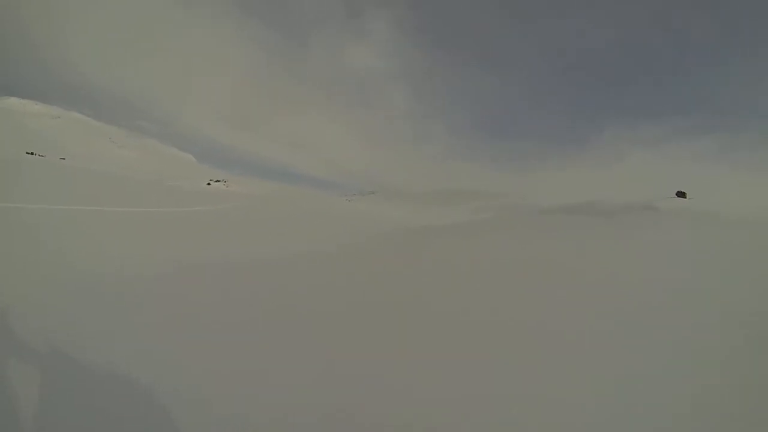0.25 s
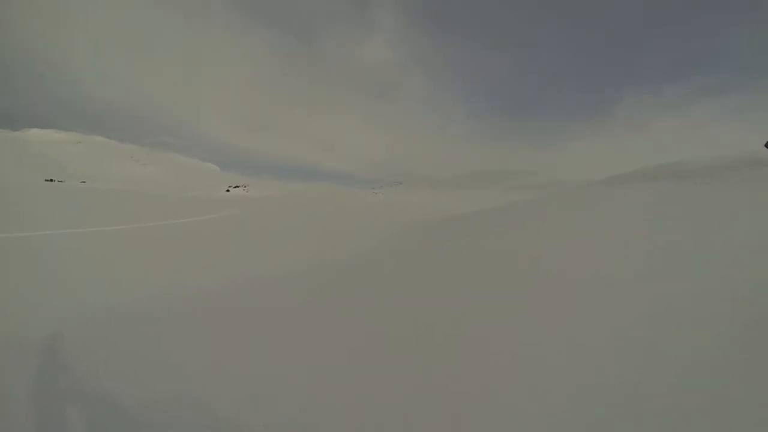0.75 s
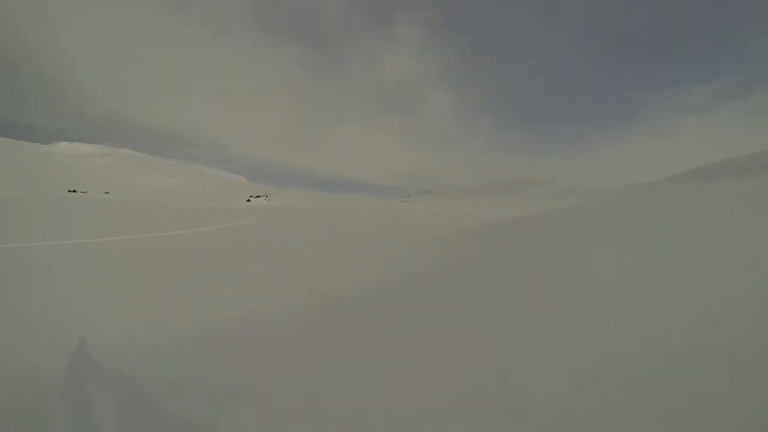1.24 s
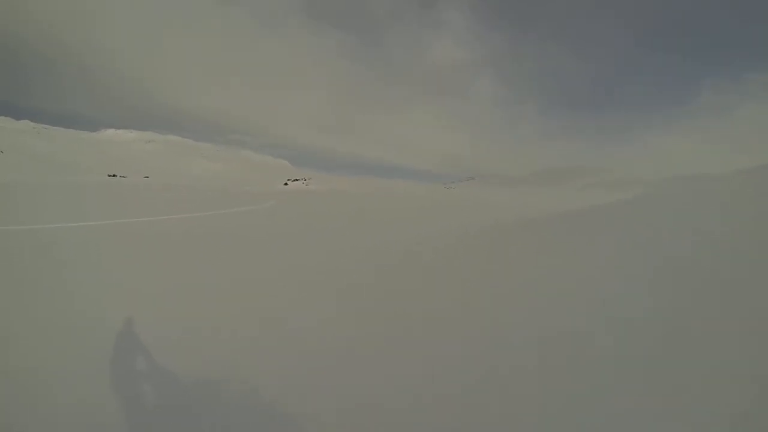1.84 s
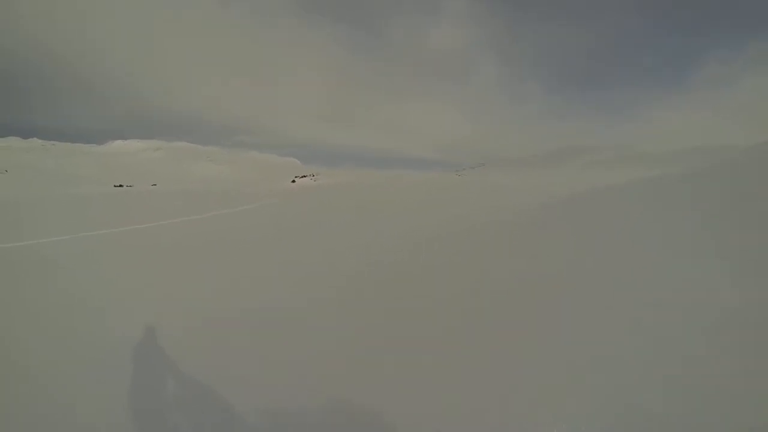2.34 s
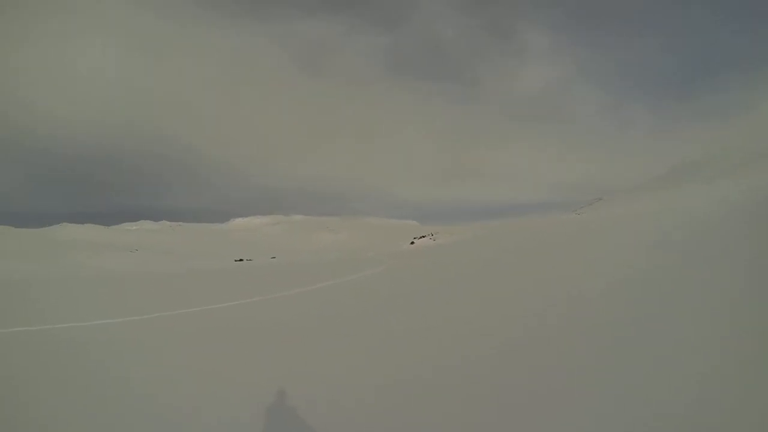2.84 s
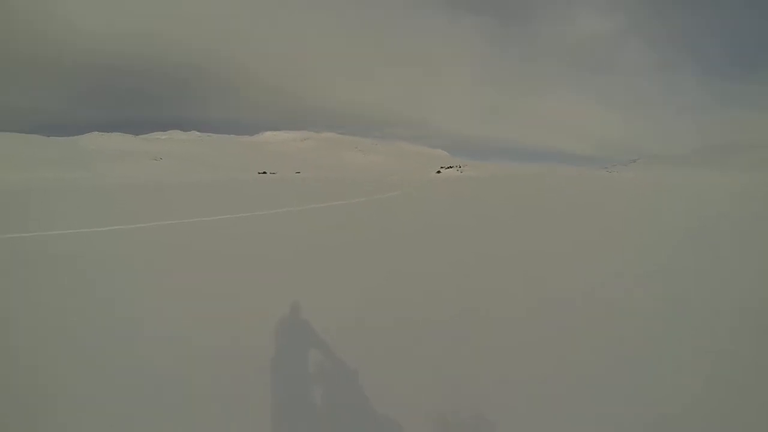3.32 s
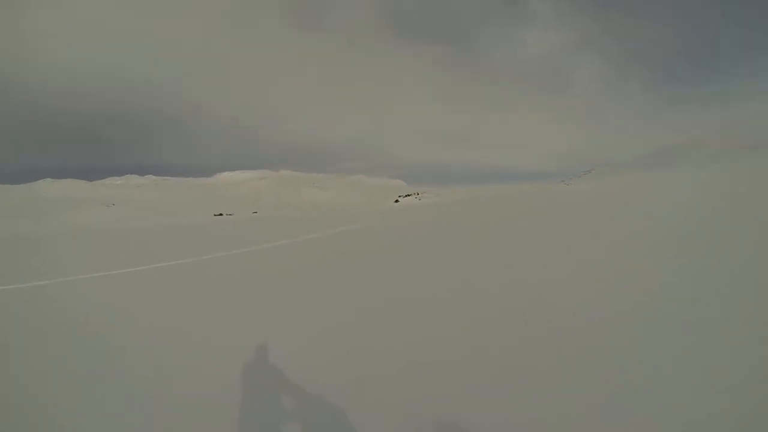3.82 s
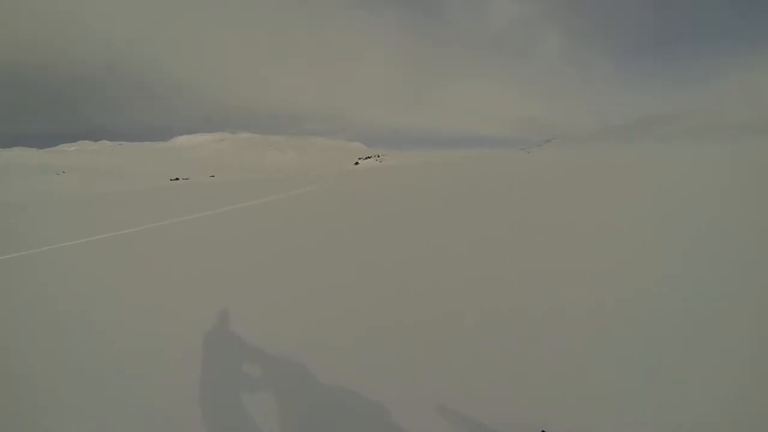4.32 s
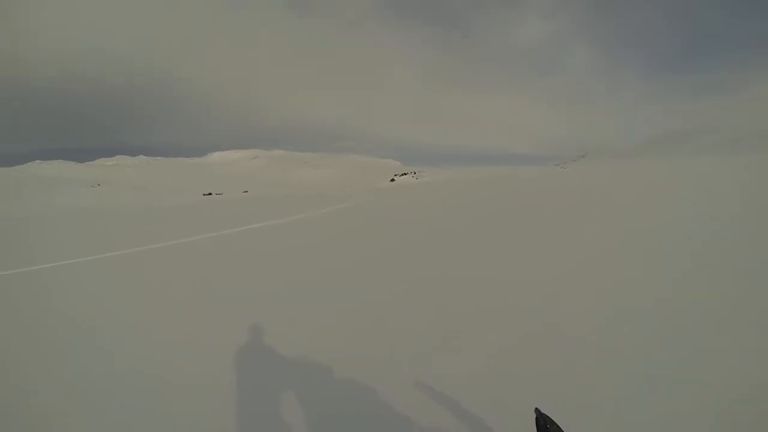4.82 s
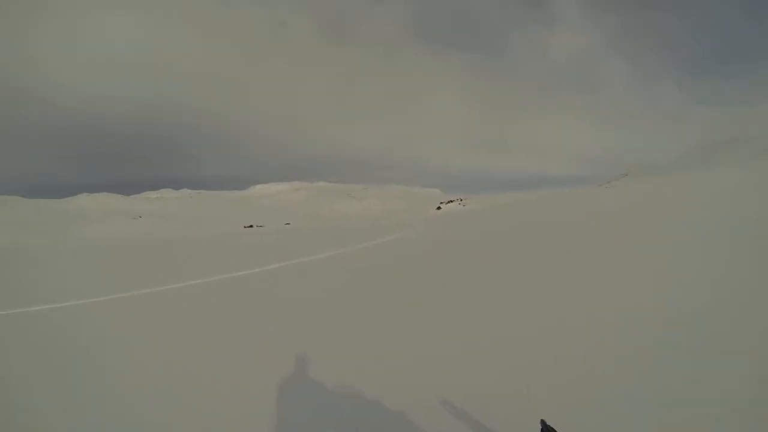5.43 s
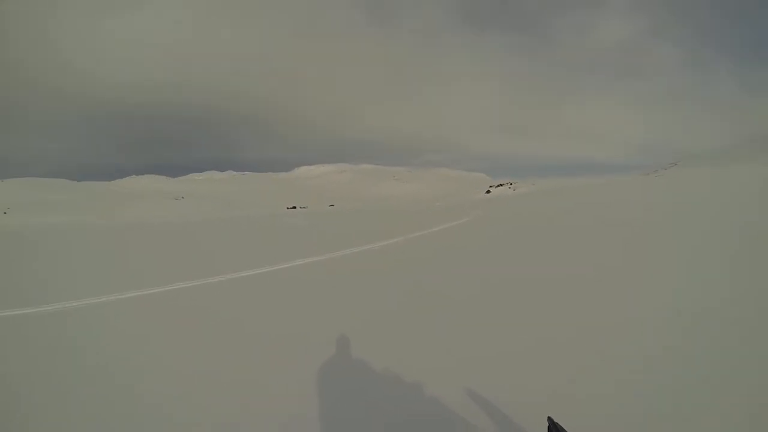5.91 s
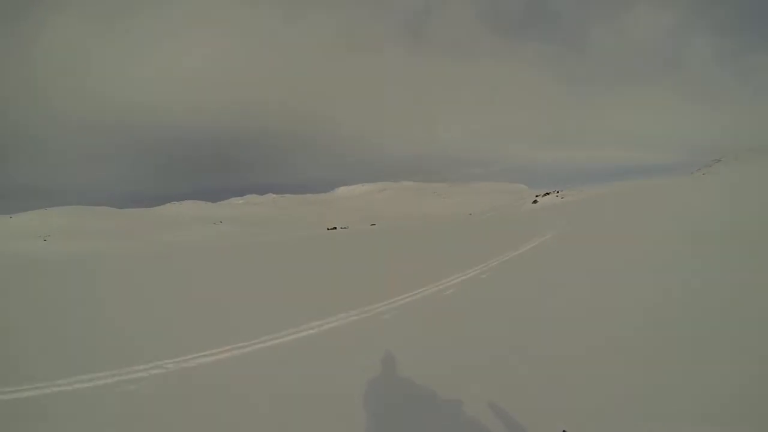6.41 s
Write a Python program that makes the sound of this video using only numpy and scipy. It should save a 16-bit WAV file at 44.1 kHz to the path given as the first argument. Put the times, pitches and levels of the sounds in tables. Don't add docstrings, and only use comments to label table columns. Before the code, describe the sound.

Heard from a sealed camera on the rider's helmet, a turbocharged snowmobile shuts its throttle: a bright hissing, squealing blow-off and falling whistle, while the engine note drops quickly. It putters unevenly, then coasts quietly with a sliding chain whine and scattered knocks. After four seconds it surges back with boxy, nasal roar, rattling raps and gear whine. Low wind thuds on an open snowfield.

```python
import sys
import numpy as np
from scipy import signal
from scipy.fft import rfft
from scipy.io import wavfile
from scipy.ndimage import uniform_filter1d

SR = 44100
rng = np.random.default_rng(int(sys.argv[2]) if len(sys.argv) > 2 else 0)


def magnitude_from_level(level_db):
    exponent = np.asarray(level_db, float) / 20
    return 10 ** exponent


def output_pcm(signal):
    pcm = np.clip(np.atleast_2d(signal).T, -1, 1) * 32767
    wavfile.write(sys.argv[1], SR, np.round(pcm).astype(np.int16))


N = 293706
T = np.arange(N) / SR
STEP = 32
T_SLOW = np.arange(0, N, STEP) / SR


def evened(x):
    return x / np.sqrt(np.mean(x ** 2) + 1e-20)


def read(points, hz):
    f, value = np.transpose(points)
    return np.interp(np.log(hz + 1), np.log(f + 1), value, -120, -120)


def columns(rows, t):
    s, *values = np.transpose(rows)
    return [np.interp(t, s, v) for v in values]


def bumps(rows, t, size=lambda v: v, least_s=.02):
    grid = np.arange(0, N / SR + .01, least_s / 5)
    total = np.zeros(len(grid))
    for s, height, half in rows:
        away = np.clip((grid - s) / max(half, least_s), -1, 1)
        total += size(height) * np.cos(np.pi / 2 * away) ** 2
    return np.interp(t, grid, total)


def wander(count, step=1):
    knots = rng.standard_normal(int(N / SR * 100) + 9)
    knots = uniform_filter1d(knots, max(int(100 / count), 2))
    knots = evened(knots - knots.mean())
    return np.interp(np.arange(0, N, step) / SR * 100, np.arange(len(knots)), knots)


def sine(turns):
    return np.sqrt(2) * np.sin(2 * np.pi * turns)


def noise(points, size, band_hz, patchy_db, light=None, curve=None):
    low, high = band_hz
    frames, hz = 4 * N // size + 6, np.fft.rfftfreq(size, 1 / SR)
    a, b, patches = rng.standard_normal((frames, len(hz), 3)).T
    patches = uniform_filter1d(patches, size=6, axis=0)
    patches = evened(uniform_filter1d(patches, size=7, axis=1))
    shape_db = read(points, hz)[:, None] * np.ones(frames)
    if light:
        share = np.clip(columns(curve, np.arange(frames) * size / 4 / SR)[-1], 0, 1)
        shape_db = share * shape_db + (1 - share) * read(light, hz)[:, None]
    inside = (hz >= low) & (hz < high)
    shape = magnitude_from_level(shape_db) / np.linalg.norm(magnitude_from_level(shape_db[inside]), axis=0)
    spectra = (a + 1j * b) * shape * magnitude_from_level(patchy_db * patches)
    x = signal.istft(spectra, nperseg=size, noverlap=size * 3 // 4)[1][:N]
    power, all_hz = abs(rfft(x)) ** 2, np.fft.rfftfreq(N, 1 / SR)
    in_band = power[(all_hz >= low) & (all_hz < high)].sum()
    return evened(x) * np.sqrt(power.sum() / in_band)


def narrow(hz, width_hz):
    b, a = signal.butter(2, width_hz / 2, fs=SR)
    slow = rng.standard_normal(len(hz)) + 1j * rng.standard_normal(len(hz))
    slow = signal.lfilter(b, a, slow)
    return evened((slow * np.exp(2j * np.pi * np.cumsum(hz) / SR)).real)


# t/s, f/Hz
SPEED = [(0, 210), (.06, 199), (.27, 125), (.39, 105), (.6, 119.5), (1.06, 126), (1.18, 124), (1.37, 106.5),
         (1.62, 100.2), (3.26, 92.6), (3.55, 98.3), (4.03, 103.5), (4.56, 125.5), (5.42, 152.5), (5.9, 155),
         (6.14, 156.5), (6.43, 175), (6.66, 178)]
# centre t/s, shift f/Hz, half length t/s
SURGES = [
    (2.55, -1.5, .25),
    (2.87, 1, .15),
    (4.32, 22, .27),
    (4.73, 6.5, .16),
    (5.17, 18, .25),
]


def crank():
    hz = uniform_filter1d(columns(SPEED, T)[0] + bumps(SURGES, T), size=2000)
    return hz, np.cumsum(hz * (1 + .002 * wander(20))) / SR


def order(turns, k, db):
    return magnitude_from_level(db).repeat(STEP)[:N] * sine(k * turns + rng.random())


# t/s, load [0-1]
LOAD = [(0, .8), (.3, .3), (.6, .3), (1.15, .4), (1.3, .02), (3.5, .05), (4, .3), (4.3, .6), (4.5, .6),
        (5, .8), (5.4, .9), (6.66, .99)]
# coasting level/dB, loaded level/dB
FIRING = [
    (-35.5, -33.5),
    (-40, -34),
    (-41.5, -44.5),
    (-56, -42),
    (-58, -37.5),
]
# centre t/s, level/dB, half length t/s
BOOMS = [
    [(.02, 8, 0.082), (.2, 6, 0.083), (.31, 11.5, 0.14), (.7, -6, 0.1), (1.27, 6, 0.31), (2.62, 8, 0.39),
     (3.05, -3.5, 0.17), (3.6, -3.5, 0.17), (4.07, 10.5, 0.32), (4.5, 5, 0.19), (5.1, 5, 0.21),
     (6.1, 4.5, 0.31), (6.57, -3, 0.21)],
    [(.23, -3, 0.29), (3.4, 2, 0.89), (1.05, 5, 0.31), (1.42, -35, 0.29), (1.8, -7.5, 0.57),
     (4.22, 7.5, 0.5)],
    [(0, 4, .1), (.2, -16, 0.23), (.75, -10, 0.26), (1.42, -25, 0.35), (4.0, 4.5, 0.33), (5.35, -5, 0.34),
     (6.6, 4.5, 0.77)],
    [(0, 9.5, 0.14), (.19, 7, 0.083), (.4, 1, 0.13), (1.5, -7, 0.4), (4.68, -3.5, 0.16), (3.88, 6, 0.17),
     (4.36, -19.5, 0.32), (4.9, -6, 0.15)],
    [(1.4, 15.5, 0.49), (4.4, 12, 0.45), (6.1, 3, 0.15)],
]
# centre t/s, flutter level/dB, half length t/s
STUMBLE = [
    (.12, 1.5, .35),
]


def under_load(coasting_db, loaded_db):
    return coasting_db + columns(LOAD, T_SLOW)[0] * (loaded_db - coasting_db)


def firing(turns):
    out = np.zeros(N)
    for k, (coasting, loaded), rows in zip([1, 2, 3, 4, 4 / 3], FIRING, BOOMS):
        db = under_load(coasting, loaded) + bumps(rows, T_SLOW) + 1.8 * wander(9, STEP)
        flutter_db = bumps(STUMBLE, T_SLOW) * wander(30, STEP)
        out += order(turns, k, db + flutter_db)
    return out


# thirds of the firing rate, coasting level/dB, loaded level/dB
UNEVEN = [(2, -42, -46), (5, -50, -46), (7, -50, -46), (8, -50, -53), (10, -51, -51), (11, -62, -54),
          (13, -60, -61), (14, -64, -59), (15, -63, -53), (16, -68, -61), (17, -68, -58), (18, -63, -59),
          (19, -70, -56), (20, -70, -61), (21, -68, -62)]
# centre t/s, level/dB, half length t/s
RASP = [
    (0, 10.5, 0.15),
]


def uneven_cylinders(turns):
    out = np.zeros(N)
    for third, coasting, loaded in UNEVEN:
        db = under_load(coasting, loaded) - 3.5 + bumps(RASP, T_SLOW) + 3.5 * wander(4, STEP)
        out += order(turns, third / 3, db)
    return out


# (centre t/s, peak
# level/dB, half length t/s)
GEARS = [
    (10, [(5.87, -23.5, .16), (6.06, -19.5, .15), (5.2, -25, .2)]),
    (29 / 3, [(6.355, -19, .06)]),
    (13, [(6.48, -40, .08), (6.6, -38, .2)]),
    (9, [(5.5, -32, .15), (5.8, -31, .2)]),
    (8, [(6.55, -28, .25)]),
    (26 / 3, [(6.56, -25, .15)]),
    (32 / 3, [(5.5, -25, .05), (5.88, -26.5, .22)]),
    (5, [(4.75, -51, .4), (6.0, -57, .4)]),
    (19 / 3, [(5.9, -57, .2)]),
]


def gears(turns):
    out = np.zeros(N)
    for k, rows in GEARS:
        db = 20 * np.log10(bumps(rows, T_SLOW, magnitude_from_level) + 1e-5)
        out += order(turns, k, db + 1.5 * wander(12, STEP))
    return out


# f/Hz, level/dB
ROAR = [(620, -61), (1050, -40), (1160, -28), (1380, -11), (1470, -11), (1550, 1.5), (1720, -4.5),
        (1780, -23.5), (1950, -31), (2060, -20.5), (2270, -23), (2630, -38.5), (2930, -29), (3320, -25.5),
        (4100, -39.5), (5330, -67), (9020, -120)]
# f/Hz, level/dB
ROAR_AWAY = [(560, -67), (950, -76.5), (1010, -13), (1130, -20.5), (1370, 1.5), (1600, 4), (1770, -6),
             (1940, -17), (2280, -12), (2470, -17.5), (2770, -15.5), (3330, -19.5), (4100, -29),
             (5330, -63), (9020, -120)]
# t/s, roar level/dB
EFFORT = [(0, -15), (.25, -15), (.32, -18), (.52, -18), (.62, -25.5), (.75, -27.5), (.9, -22), (1.2, -22),
          (1.52, -24), (1.7, -26.5), (2.0, -29), (2.4, -31), (3.3, -31.5), (3.97, -30), (4.25, -24.5),
          (4.7, -23.5), (5.1, -20.5), (6.1, -19.5), (6.66, -17)]
# t/s, share of the exhaust-side colour [0-1]
HELMET = [
    (0, 0.03),
    (1.1, 0.06),
    (2.2, 0.27),
    (3.9, 0.52),
    (4.7, 0.62),
    (5.5, 0.48),
    (6.05, 0.49),
    (6.66, 0.48),
]
# centre t/s, level/dB, half length t/s
BARKS = [
    (4.35, 5, 0.13),
    (4.69, 3.5, 0.19),
    (4.99, 4, 0.075),
    (5.27, 1.5, 0.18),
    (5.49, 1, 0.035),
    (6.29, -2.5, 0.12),
    (6.355, 0, 0.017),
    (6.43, -4.5, 0.041),
]


def knock(hz, turns, roar_db):
    knock_db = roar_db[::STEP] - 14 + 20 * np.log10(columns(LOAD, T_SLOW)[0])
    out = np.zeros(N)
    for third in range(22, 43):
        case_db = read(ROAR, third / 3 * hz[::STEP])
        out += order(turns, third / 3, knock_db + case_db + 4 * wander(5, STEP))
    return out


def roar(roar_db, puff, hush):
    x = noise(ROAR, 1024, (1150, 2000), patchy_db=0.13, light=ROAR_AWAY, curve=HELMET)
    x = magnitude_from_level(roar_db - 3.0) * puff * x
    band = signal.butter(2, (1150, 1950), 'bandpass', fs=SR, output='sos')
    return x - (1 - hush) * signal.sosfiltfilt(band, x)


def ring(effort_db):
    helmet_db = 10 * np.log10(np.clip(columns(HELMET, T)[0], .05, 1))
    level_db = effort_db + 1.4 * bumps(BARKS, T) + helmet_db - 5
    return magnitude_from_level(level_db) * narrow(1655 + 30 * wander(6), width_hz=24)


# t/s, peak level/dB
RAPS = [(0.7, -24), (0.7655, -19), (1.0537, -21), (1.3233, -15.5), (1.3587, -13), (1.7293, -21),
        (2.0248, -20), (2.2447, -20), (3.2131, -21), (3.261, -32), (3.3406, -19.5), (3.7996, -19),
        (4.1188, -19), (4.1725, -21), (4.3259, -9.5), (4.348, -12.5), (4.3685, -8.5), (4.3928, -14),
        (4.4852, -21), (4.554, -14), (4.6308, -13), (4.852, -13), (4.8746, -10.5), (5.472, -12),
        (5.6772, -16), (5.7942, -13), (5.91, -10.5), (6.168, -11), (6.2776, -10), (6.5235, -9),
        (6.6079, -12)]


def raps():
    rise_s, fall_s = .0036, .0038
    t, out = np.arange(0, .04, 1 / SR), np.zeros(N + SR)
    shape = np.sin(np.pi / 2 * np.minimum(t / rise_s, 1)) ** 2
    shape *= np.exp(-(np.maximum(t - rise_s, 0) / fall_s) ** 2)
    for s, db in RAPS:
        detune, phase = rng.standard_normal(2)
        at = round((s - rise_s / 2) * SR)
        out[at:at + len(t)] += magnitude_from_level(db - 1) * shape * np.sin(2 * np.pi * ((1620 + 50 * detune) * t + phase))
    hush_db = bumps([(s, -14, .008) for s, db in RAPS], T, least_s=.002)
    return out[:N], magnitude_from_level(hush_db)


# t/s, jet level/dB
VALVE = [
    (0, -40.5),
    (.1, -36),
    (.13, -35),
    (.17, -34.5),
    (.23, -38.5),
    (.28, -40),
    (.36, -53),
    (.56, -71),
    (.6, -65),
]
# f/Hz, level/dB per Hz
JET = [(1180, -58), (2000, -10), (2210, -17), (2440, -18), (2840, -1.5), (3090, -1), (3770, 1), (4310, -12),
       (5680, -1.5), (6330, 1.5), (7060, -12.5), (8200, -3.5), (9220, -13), (12900, -12), (15200, -31)]
# f/Hz, width f/Hz, centre t/s, peak level/dB, half length t/s
SQUEALS = [
    (2900, 70, .13, -38, .24),
    (3700, 70, .165, -31, .07),
    (3890, 90, .152, -37, .03),
    (3550, 500, .18, -32, .1),
    (3250, 70, .24, -34, .05),
    (3480, 90, .275, -39, .03),
    (3300, 150, .14, -38, .04),
    (2820, 90, .31, -39, .04),
]


def valve():
    t = np.arange(round(VALVE[-1][0] * SR)) / SR
    jet = noise(JET, 512, (4000, 10000), patchy_db=-2.5)[:len(t)]
    out = magnitude_from_level(columns(VALVE, t)[0]) * jet
    for hz, width_hz, *swell in SQUEALS:
        out += bumps([swell], t, magnitude_from_level) * narrow(np.full(len(t), float(hz)), width_hz)
    return np.pad(out, (0, N - len(t)))


# t/s, f/Hz, level/dB
TURBINE = [
    (0, 12970, -50),
    (.04, 12910, -52),
    (.074, 12650, -50),
    (.1, 12050, -54),
    (.136, 11210, -52),
    (.19, 11000, -66),
]


def turbine():
    hz, level_db = columns(TURBINE, T)
    turns = np.cumsum(hz * (1 + .004 * wander(27))) / SR
    start_s, end_s = TURBINE[0][0], TURBINE[-1][0]
    fade = np.clip(np.minimum(T - start_s + 0.012, end_s - T + 0.0022) / 0.015, 0, 1)
    return fade * magnitude_from_level(level_db) * sine(turns)


# t/s, f/Hz
TRACK = [(.4, 2090), (.95, 2150), (1.15, 2120), (1.35, 1890), (1.55, 1735), (1.75, 1662), (2.25, 1535),
         (2.45, 1440), (2.65, 1388), (2.9, 1350), (3.05, 1285), (3.24, 1243), (3.9, 1205), (4.9, 1887),
         (5.2, 1990), (6.08, 2040), (6.3, 2190), (6.66, 2305)]
# centre t/s, peak level/dB, half length t/s
LUG = [
    (.45, -33.5, 0.12),
    (1.33, -41.5, 0.26),
    (2.6, -37, 0.25),
    (3.8, -47, .2),
    (5.2, -37, 0.63),
    (5.9, -47.5, 0.31),
    (6.3, -49, 0.18),
]
# centre t/s, peak level/dB, half length t/s
LUG_OCTAVE = [
    (1.05, -48, 0.24),
    (2.35, -55, 1),
    (5.5, -57, 0.15),
    (5.95, -46, 0.46),
]
# centre t/s, peak level/dB, half length t/s
WHINE = [
    (1.55, -37, .2),
    (2.17, -32, .45),
    (3.05, -42, .75),
]
# centre t/s, peak level/dB, half length t/s
WHINE_HIGH = [
    (2.17, -50, .2),
    (2.78, -54, .35),
]
# centre t/s, peak level/dB, half length t/s
WHINE_OCTAVE = [
    (1.93, -54, .15),
    (2.25, -55, .15),
    (2.63, -57, .15),
    (2.92, -57, .18),
]


def track():
    hz = uniform_filter1d(columns(TRACK, T)[0], size=2000)
    links = np.cumsum(hz * (1 + .002 * wander(25))) / SR
    lugs = np.cumsum(hz * (1 + .004 * wander(25))) / SR / 10.2
    parts = [(LUG, lugs), (LUG_OCTAVE, 2 * lugs), (WHINE, links),
             (WHINE_HIGH, 3 / 2 * links), (WHINE_OCTAVE, 2 * links)]
    return sum(bumps(rows, T, magnitude_from_level) * sine(turns) for rows, turns in parts)


def follow(effort_db, idle_db, slope, lagged):
    boost_lag_s = 0.35
    r = np.exp(-1 / (boost_lag_s * SR))
    above = effort_db + 31
    boost = signal.lfilter([1 - r], [1, -r], above, zi=[r * above[0]])[0]
    return idle_db + slope * (lagged * boost + (1 - lagged) * above)


# f/Hz, level/dB
HISS = [(2240, -23), (3800, -3.5), (4040, -13.5), (4380, -2), (4880, -3), (5620, -11.5), (5910, -8),
        (6540, -6), (7080, -18), (8210, -8.5), (9300, -24), (10100, -20.5), (11900, -28.5), (13100, -24),
        (15200, -42)]
# f/Hz, level/dB
HISS_LIGHT = [(2240, -25), (3800, -0.5), (4070, 1), (5020, 6.5), (5680, -2), (6810, -8.5), (8260, -6),
              (8790, -13), (10600, -22.5), (13100, -33.5), (14700, -33.5)]


def intake(effort_db, flicker_db, puff):
    level_db = follow(effort_db, idle_db=-62.5, slope=1.43, lagged=0.22)
    level_db = level_db + 0.1 * bumps(SURGES, T)
    hiss = noise(HISS, 512, (4000, 10000), patchy_db=1.05, light=HISS_LIGHT, curve=LOAD)
    return magnitude_from_level(level_db + flicker_db) * puff * hiss


# f/Hz, level/dB
RUMBLE = [(40, 7.5), (70, 28), (110, 20.5), (200, 7), (330, 4.5), (420, 4), (600, 3), (800, -8.5),
          (1000, -17), (1200, -19)]
# f/Hz, level/dB
RUMBLE_LIGHT = [(40, 16), (110, 10.5), (330, 2), (500, -5.5), (750, -8), (1000, -6), (1200, -9.5)]


def rumble(effort_db):
    level_db = follow(effort_db, idle_db=-53.5, slope=0.77, lagged=0.28) + bumps(STUMBLE, T)
    return magnitude_from_level(level_db) * noise(RUMBLE, 2048, (420, 1000), patchy_db=1.5, light=RUMBLE_LIGHT, curve=HELMET)


# t/s, f/Hz, level/dB
NOD = [(0, 14, -25), (.42, 13, -23), (.62, 13.5, -16), (.85, 13.2, -19), (1.2, 14, -23), (1.48, 13.7, -30),
       (1.85, 13.5, -18), (2.1, 14.5, -21), (2.35, 12, -18), (2.7, 12.2, -27), (3.25, 14.5, -22),
       (3.55, 12, -30), (3.9, 12.7, -23), (4.7, 15, -28), (5.1, 14.6, -18), (5.9, 14.8, -23),
       (6.1, 15, -33), (6.66, 15.3, -25)]


def nod():
    hz, level_db = columns(NOD, T)
    turns = np.cumsum(hz * (1 + .1 * wander(7))) / SR
    swing = sine(turns) + .25 * sine(2 * turns + 1 / (2 * np.pi))
    return magnitude_from_level(level_db - 1.5 + 1.2 * wander(6)) * swing


# f/Hz, level/dB
WIND = [(16, -13), (24, 2), (35, 6), (50, 2.5), (65, -5), (80, -12), (100, -22.5), (140, -28.5)]
# centre t/s, level/dB, half length t/s
THUDS = [(.33, 7, .1), (.62, 9.5, 0.13), (1.68, 15, 0.059), (3.2, 8, .2), (3.7, -9, .15), (4.4, 7.5, 0.17),
         (4.85, 5, .06), (4.97, -8, .05), (5.88, 10, .08), (6.12, 0.5, 0.15), (6.55, 3.5, .1)]


def wind():
    level_db = -31.5 + 6 * columns(LOAD, T)[0] + bumps(THUDS, T)
    return magnitude_from_level(level_db) * noise(WIND, 4096, (24, 85), patchy_db=0.4)


# f/Hz, level/dB per Hz
SNOW = [(2240, -29.5), (3800, -2), (4400, 10.5), (4690, -10.5), (5190, 0), (7410, -7), (8210, -26),
        (8990, -15), (10200, -12.5), (13100, -19.5), (14700, -32)]


def snow():
    return magnitude_from_level(-62) * noise(SNOW, 512, (4000, 10000), patchy_db=1.5)


def scene():
    effort_db = columns(EFFORT, T)[0]
    roar_db = effort_db + 0.56 * bumps(BARKS, T)
    hz, turns = crank()
    flicker_db = .5 * wander(25)
    puff = 1 + 0.052 * np.cos(2 * np.pi * turns)
    rapping, hush = raps()
    mix = firing(turns) + uneven_cylinders(turns) + gears(turns) + knock(hz, turns, roar_db)
    mix += roar(roar_db + flicker_db, puff, hush) + hush * ring(effort_db) + rapping
    mix += valve() + turbine() + track()
    mix += intake(effort_db, flicker_db, puff) + rumble(effort_db)
    mix += nod() + wind() + snow()
    return mix[None]


def low_pass(x):
    return signal.sosfilt(signal.butter(12, 15050, fs=SR, output="sos"), x)


def record(dry):
    return low_pass(dry)


dry = scene()
out = record(dry)
output_pcm(out)
```